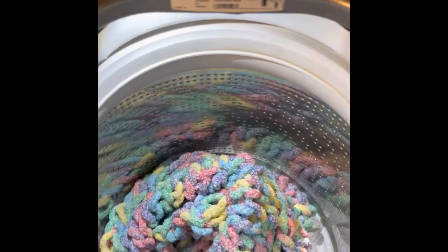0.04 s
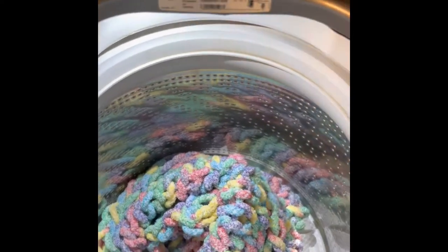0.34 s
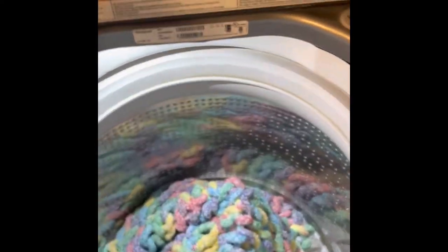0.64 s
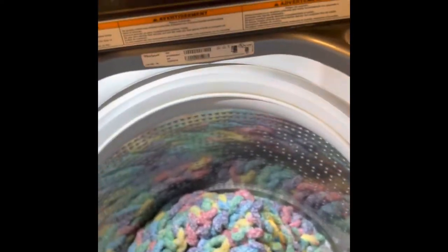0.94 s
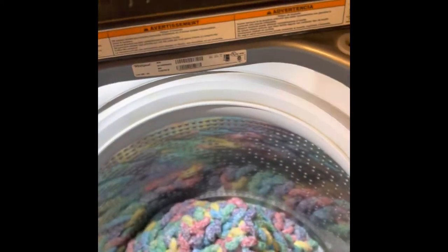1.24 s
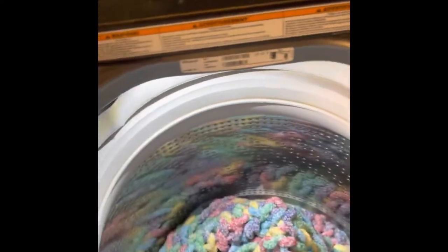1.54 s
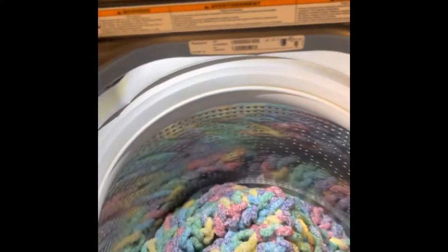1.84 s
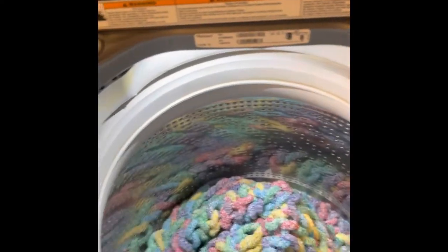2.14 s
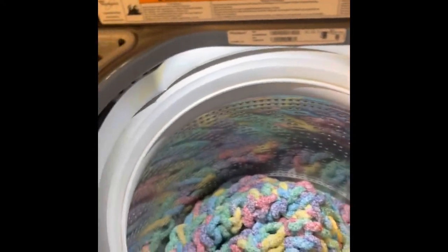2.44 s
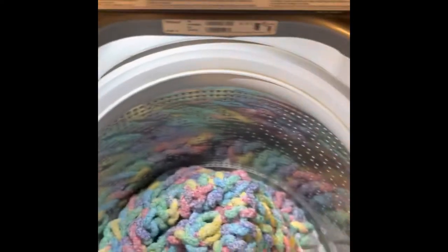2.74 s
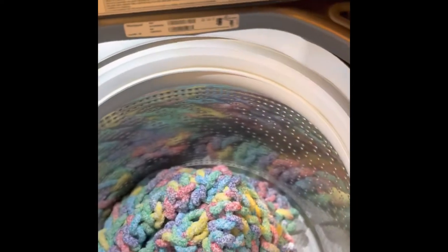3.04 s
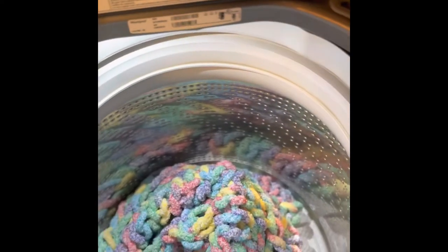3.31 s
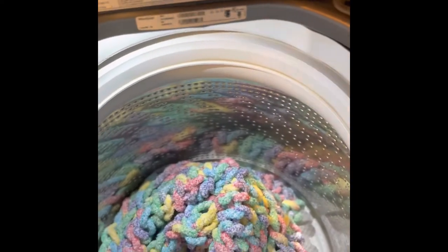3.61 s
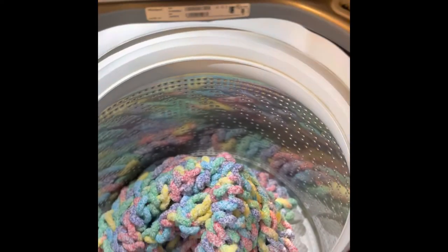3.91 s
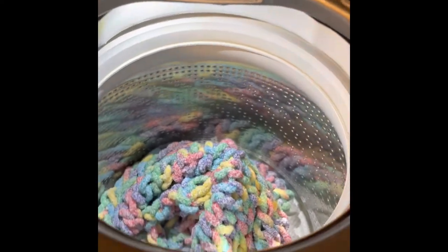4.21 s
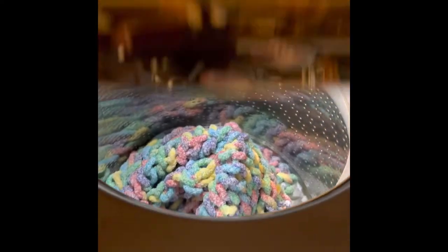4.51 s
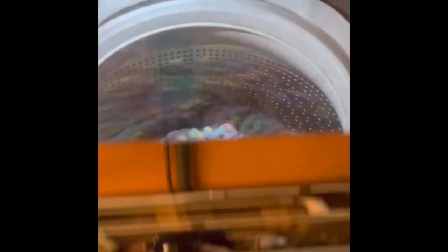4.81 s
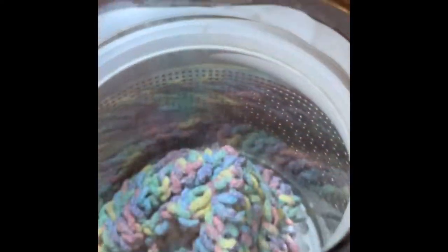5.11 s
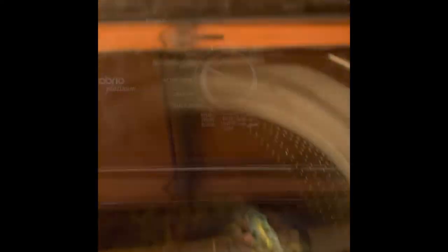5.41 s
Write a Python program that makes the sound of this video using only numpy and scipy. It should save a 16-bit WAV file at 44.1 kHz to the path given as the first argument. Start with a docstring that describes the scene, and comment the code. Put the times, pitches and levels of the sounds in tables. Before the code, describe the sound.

A top-loading washing machine runs close by in a small laundry room, giving a steady low hum and a deep rumble throughout. The rumble swells briefly around 0.3 and 1 second, and again between 3 and 3.5 seconds. Clothing rustles softly as someone shifts beside it, at about 0.3 seconds, most noticeably from 1.7 to 2.5, and more faintly afterwards. Light taps and clicks on the plastic top come near 0.3 and 1.7 seconds, then several between 3 and 4.2. At about 5 seconds the glass lid falls shut, by far the loudest sound: one heavy thump with a sharp slap, a quick rattle and a hollow boom from the steel cabinet. A softer, dull rebound follows near 5.3 seconds. The pane rings faintly and a short room echo fades while the machine hums on to the end.

```python
"""A washing machine's glass lid falls shut

A top-loading washer runs in a small laundry room: its motor hums, its tub and panels rumble at resonance.
Someone shifts beside it, with the friction noise of clothes and light taps on the plastic top.
Then the glass lid falls: it slaps the rim, rattles and rebounds. The impacts excite the modes of the
steel cabinet, which booms, and of the pane, which rings on faintly."""
import sys
import numpy as np
from scipy import signal
from scipy.fft import rfft, irfft, next_fast_len
from scipy.io import wavfile
from scipy.ndimage import map_coordinates

SR = 44100
rng = np.random.default_rng(int(sys.argv[2]) if len(sys.argv) > 2 else 0)


def pcm_store(signal):
    """Save signal as 16-bit PCM."""
    levels = np.round(np.clip(np.atleast_2d(signal), -1, 1) * 32767)
    wavfile.write(sys.argv[1], SR, levels.astype(np.int16).T)


N = 245195
TIME = np.arange(N) / SR

# the lid meets the rim: (time [s], level [dB], treble tilt [dB/octave], t60 [s])
RIM_CONTACTS = [(5.0363, -10.5, -4.5, 0.035), (5.0395, -11.5, 1.5, 0.06), (5.0434, -7, -2, 0.017),
                (5.0539, -15.5, 1.5, 0.057), (5.061, -12.5, 3.5, 0.029), (5.069, -17, 8, 0.022),
                (5.0686, -17, 7, 0.03), (5.1106, -26.5, -3.5, 0.038), (5.1264, -15.5, -1, 0.024),
                (5.149, -22, -15, 0.016)]


def from_db(db):
    """Amplitude ratio of a level in decibels."""
    return 10 ** (np.asarray(db) / 20)


def rms_one(x):
    """Normalisation to unit rms."""
    return x / np.sqrt(np.mean(x ** 2) + 1e-20)


def at_hz(points, hz):
    """Interpolation of a table on a log-frequency axis."""
    points = np.array(points)
    return np.interp(np.log(hz), np.log(points[:, 0]), points[:, 1])


def bins(size):
    """Fourier frequencies of this many samples, no lower than 1 Hz."""
    return np.maximum(np.arange(size // 2 + 1) * SR / size, 1)


def shape(spectrum):
    """Spectral envelope: a table's gain against frequency, falling steeply below its first point."""
    return lambda hz: from_db(at_hz(spectrum, hz)) * np.minimum(hz / spectrum[0][0], 1) ** 3


def drift(rate_hz):
    """Random fluctuation: low-passed noise of unit rms."""
    size = next_fast_len(N, True)
    spectrum = rfft(rng.standard_normal(N), size) / (1 + (bins(size) / rate_hz) ** 4)
    return rms_one(irfft(spectrum, size)[:N])


def swell(crest_s, rise_s, fall_s, steepness=2):
    """Asymmetric envelope of height 1: Gaussian at steepness 2, more abrupt above."""
    width_s = np.where(TIME < crest_s, rise_s, fall_s)
    return np.exp(-np.abs((TIME - crest_s) / width_s) ** steepness)


def decay(t60, size):
    """Exponential damping, by 60 dB in t60 seconds."""
    return np.exp(-np.log(1000) * np.arange(size) / SR / max(t60, 1e-3))


def ring(hz, db, t60, size=SR):
    """Free vibration of one struck mode: a damped sinusoid."""
    return from_db(db) * np.sin(2 * np.pi * hz * TIME[:size]) * decay(t60, size)


def diffuse(gain, size=N, coherence=None):
    """Partially coherent stereo noise: the balance of mid and side sets the correlation."""
    # left-right likeness of diffuse sound, with both channels carrying nearly one signal above 6 kHz:
    # (frequency [Hz], correlation)
    field_coherence = [(100, 1), (200, 1), (380, 0.85), (800, 0.067), (1500, 0.49), (2600, 0.58),
                       (4000, 0.11), (5000, 0.47), (5900, 0.99), (15000, 1)]
    padded = next_fast_len(size, True)
    hz = bins(padded)
    alike = np.clip(at_hz(coherence or field_coherence, hz), -.9, .9995)
    mid, side = rfft(rng.standard_normal((2, padded))) * gain(hz) * np.sqrt([1 + alike, 1 - alike])
    return rms_one(irfft(np.array([mid + side, mid - side]), padded)[:, :size])


def burst(gain, t60, size=12000):
    """Modal overlap: a knock on a part with many modes is decaying noise, starting at rms 1."""
    # left-right likeness of knocks close by, with both channels carrying nearly one signal above 6 kHz:
    # (frequency [Hz], correlation)
    near_coherence = [(400, 0.8), (1200, 0.77), (2500, 0.41), (4800, 0.16), (5900, 0.92), (12000, 0.98)]
    envelope = decay(t60, size)
    return rms_one(diffuse(gain, size, near_coherence) * envelope) * np.sqrt(np.mean(envelope ** 2))


def add(track, s, sound):
    """Superposition of a sound on a track, from s seconds on."""
    start = int(round(s * SR))
    track[..., start:start + sound.shape[-1]] += sound[..., :N - start]


def direct_path(x, lag_samples, pan_db):
    """Path difference: direct sound reaches two microphones at slightly different times and levels."""
    right = map_coordinates(x, [np.arange(N) - lag_samples], order=3)
    return np.array([x * from_db(pan_db / 2), right * from_db(-pan_db / 2)])


def room(x, first_echo_s=0.0029):
    """Reverberation: diffuse reflections from close walls, dying sooner in the treble."""
    # reverberation time of the laundry room: (frequency [Hz], t60 [s])
    reverb_times = [(200, 0.69), (1000, 0.47), (4000, 0.32), (12000, 0.25)]
    size, response = SR // 2, 0
    edges_hz = np.geomspace(150, 16000, 8)
    for low, high in zip(edges_hz, edges_hz[1:]):
        bandpass = signal.butter(2, [low, high], "band", fs=SR, output="sos")
        band = signal.sosfilt(bandpass, diffuse(np.ones_like, size))
        response += band * decay(at_hz(reverb_times, np.sqrt(low * high)), size)
    response *= np.clip(TIME[:size] / first_echo_s - 1, 0, 1)
    return signal.fftconvolve(x[None], rms_one(response) / np.sqrt(size), axes=1)[:, :N]


def motor_hum(hum_hz=119.86, waver_db=0.96):
    """Magnetic forces pulse at twice the mains frequency, giving a harmonic series that wavers slightly."""
    # partials of the hum: (harmonic number, rms level [dB])
    harmonics = [(1, -31.5), (2, -48), (3, -63.5), (4, -63)]
    phase = 2 * np.pi * hum_hz * TIME + 0.03 * drift(rate_hz=2.5)
    tone = sum(from_db(db) * np.sqrt(2) * np.sin(k * phase + rng.uniform(0, 2 * np.pi))
               for k, db in harmonics)
    return tone * from_db(waver_db * drift(rate_hz=2.6))


def machine_rumble(tub_db=-2.5, rush_db=-40.0):
    """Forced vibration: random shaking drives tub and panel resonances in surges, over an even rush."""
    # two tub resonances, then those of the side panels: (frequency [Hz], half-width [Hz], level [dB])
    resonances = [(66.4, 6.9, -43), (75.1, 8.8, -39.5), (129.4, 21, -40.5), (176.5, 39, -43),
                  (214.4, 15, -42.5), (239.8, 36.7, -43), (360.3, 12, -49), (401, 13, -53.5),
                  (456.6, 5.5, -54.5)]
    # brief swells of the tub: (crest time [s], level relative to its steady rumble [dB])
    tub_swells = [(.31, 6.5), (.92, 11), (1.12, 8), (2.06, 3), (2.33, 5), (3.09, 8), (3.27, 4), (3.55, 8),
                  (3.97, 1), (4.76, 2)]
    # course of the side panels' rumble: (time [s], level [dB])
    panel_levels = [(0, -0.5), (1.6, 0.5), (2.05, 1.5), (3.1, -2), (4.2, -4), (4.8, -0.5)]
    # rush of the machine and the room: (frequency [Hz], relative spectral level [dB])
    rush_spectrum = [(20, -14), (35, -9), (60, 0), (150, -2), (280, -10.5), (500, -10), (800, -17.5),
                     (1500, -29), (3000, -31.5), (4500, -33.5), (8000, -37), (13000, -42.5)]
    surges = sum(from_db(db) * swell(s, rise_s=0.056, fall_s=.07) for s, db in tub_swells)
    bands = [from_db(db) * diffuse(lambda hz: 1 / (1 + ((hz - centre) / half_width) ** 2))
             for centre, half_width, db in resonances]
    tub = from_db(tub_db) * (1 + surges) * sum(bands[:2])
    panels = from_db(np.interp(TIME, *np.transpose(panel_levels))) * sum(bands[2:])
    return tub + panels + from_db(rush_db) * diffuse(shape(rush_spectrum))


def clothes(grain_db=1.0, creep_db=-69):
    """Sliding friction: the noise power of cloth follows its speed; catching fibres make it grainy."""
    # strokes of cloth on cloth: (time of top speed [s], rise [s], fall [s], rub [dB], hiss [dB])
    strokes = [(.17, 0.024, 0.027, -48, -53), (0.306, 0.028, .06, -42.5, -45.5),
               (1.3, 0.054, 0.082, -51, -46.5), (1.68, .1, .04, -52.5, -48.5),
               (1.91, 0.067, 0.054, -43, -40), (2.08, 0.17, 0.22, -49, -49), (2.34, .1, 0.093, -41, -43.5),
               (2.45, 0.033, .06, -42, -49.5), (3.04, 0.027, 0.027, -49, -59), (3.22, 0.038, .03, -52, -59),
               (3.6, 0.1, .07, -52, -54.5), (3.77, .04, 0.041, -49.5, -51), (4.18, 0.024, .035, -55, -52),
               (4.73, .07, .28, -53, -60)]
    # dull rub: (frequency [Hz], relative spectral level [dB])
    rub_spectrum = [(250, -14), (450, 9.5), (900, -0.5), (1700, -4.5), (2500, -2.5), (4000, -9),
                    (6000, -32)]
    # fine hiss: (frequency [Hz], relative spectral level [dB])
    hiss_spectrum = [(1500, -27), (3500, 1.5), (5000, 5), (6800, 5), (8500, 1.5), (11000, -0.5), (13000, 0),
                     (15500, -9)]
    rub_power, hiss_power = 0, from_db(creep_db) ** 2   # a faint hiss remains between strokes
    for s, rise_s, fall_s, rub_db, hiss_db in strokes:
        speed = swell(s, rise_s, fall_s, steepness=2.4)
        rub_power += speed * from_db(rub_db) ** 2
        hiss_power += speed * from_db(hiss_db) ** 2
    grain = from_db(grain_db * drift(rate_hz=155))
    rub = np.sqrt(rub_power) * diffuse(shape(rub_spectrum))
    hiss = np.sqrt(hiss_power) * diffuse(shape(hiss_spectrum))
    return grain * (rub + hiss)


def hand_taps(floor_db=7.5, width_octaves=1, snap_hz=9000):
    """Impact excitation: each tap on the plastic is a snap and a short knock of its own level and pitch."""
    # light taps of a hand: (time [s], level [dB], centre frequency [Hz], snap level [dB])
    taps = [(0.1603, -39.5, 1590, -58), (0.272, -43, 900, -58), (0.281, -32, 644, -58),
            (0.2877, -36, 1040, -50), (1.306, -45, 1500, -60), (1.37, -44, 10100, -54),
            (1.68, -32.5, 1090, -58), (1.6871, -27, 2180, -54), (3.0056, -42.5, 1900, -41),
            (3.041, -41.5, 1800, -37.5), (3.1395, -43.5, 1680, -65), (3.205, -40, 2500, -38),
            (3.4892, -38, 1090, -62), (3.7228, -43.5, 1910, -64), (3.917, -37.5, 1650, -37),
            (4.0182, -31.5, 1660, -36), (4.157, -34, 7550, -44)]
    # resonances of the plastic top: (frequency [Hz], width [Hz], relative level [dB])
    top_modes = [(560, 360, 15), (1100, 340, -3.5), (1450, 200, 1), (1960, 250, -10), (3040, 380, 1),
                 (5270, 310, -2)]

    def top(hz):
        """Frequency response of the top: resonance peaks on a flat floor."""
        peaks = sum(from_db(db) / (1 + (2 * (hz - mode) / width) ** 2) for mode, width, db in top_modes)
        return from_db(floor_db) + peaks

    out = np.zeros((2, N))
    for s, db, centre, snap_db in taps:
        knock = burst(lambda hz: top(hz) / (1 + (np.log2(hz / centre) / width_octaves) ** 2), t60=0.063)
        snap = burst(lambda hz: hz / (hz + snap_hz), t60=.025)
        add(out, s, from_db(db) * knock + from_db(snap_db) * snap)
    return out


def glass_pane(pane_db=-2.0, split_hz=4.2, twin_db=-13.5):
    """Beating: the lid's first blow rings each mode of the pane together with a close twin."""
    # the frame damps all but some high modes: (frequency [Hz], relative level [dB], t60 [s])
    pane_modes = [(847, -24, .25), (1008, -31, .27), (1110, -31, .25), (1187, -25, .22), (1254, -27, .22),
                  (1347, -29, .25), (1425, -27, .24), (1648, -27, .26), (1719, -32, .3), (2204, -35, .22),
                  (2417, -53, 2.0), (2487, -55, 1.1), (2666, -52, 1.9), (2913, -44, .9), (3257, -55, 1.3),
                  (3325, -32, .3), (3468, -47, .9), (3585, -52, .9), (3688, -57, 1.5), (3830, -54, .9),
                  (3994, -54, 1.7), (4080, -60, 1.3), (4761, -38, .2), (5005, -61, 1.2)]
    out = np.zeros(N)
    for hz, db, t60 in pane_modes:
        twin_hz = hz + split_hz * rng.uniform(-1.6, 2)
        add(out, RIM_CONTACTS[0][0], ring(hz, db, t60) + ring(twin_hz, db + twin_db, t60 / 2))
    return from_db(pane_db) * out


def lid_clatter(rattle_db=-25.0, rattle_t60=0.8, rattle_s=0.12, clicks_per_s=1500, stop_s=0.0051):
    """Contact chatter: the lid cracks against the rim, and its loose frame buzzes until it settles."""
    # dense short ring of the lid frame: (frequency [Hz], relative spectral level [dB])
    frame_spectrum = [(500, 3.5), (720, -5.5), (850, 7), (1020, -5.5), (1250, 2.5), (1700, -6.5),
                      (2100, -3.5), (2600, -7.5), (3350, 0), (4700, -8), (8000, -16), (13000, -20)]
    frame = shape(frame_spectrum)
    out = np.zeros((2, N))
    for s, db, tilt_db, t60 in RIM_CONTACTS:
        crack = burst(lambda hz: frame(hz) * from_db(tilt_db * np.log2(np.maximum(hz, 700) / 700)), t60)
        add(out, s, from_db(db) * crack)
    size = SR // 2
    clicks = (rng.random(size) < clicks_per_s / SR) * rng.standard_normal(size)
    buzz = rms_one(signal.fftconvolve(clicks[None], burst(frame, t60=0.021), axes=1)[:, :size])
    settling = .5 - .5 * np.tanh((TIME[:size] - rattle_s) / stop_s)
    add(out, RIM_CONTACTS[0][0], from_db(rattle_db) * buzz * decay(rattle_t60, size) * settling)
    return out


def lid_boom(boom_db=1.65):
    """Contact time limits bandwidth: softer pushes through rubber bumpers excite only the low modes."""
    # the lid lands on its bumpers and rebounds: (time [s], impulse level [dB], contact time [s])
    landings = [(5.0387, 0, .0019), (5.0476, 17, .0117), (5.0577, 3, .0056), (5.0692, -17, .0003),
                (5.1447, -7, .0068), (5.2629, 5, .0147)]
    # steel cabinet and tub: (frequency [Hz], relative level [dB], t60 [s], sign of the first swing)
    cabinet_modes = [(48, -34, .38, 1), (70, -15, .29, -1), (84, -22, 1.6, 1), (103, -24, 1.0, 1),
                     (133, -13, .55, 1), (159, -11, .29, -1), (204, -20, .36, -1), (219, -28, .6, -1),
                     (240, -12, .24, -1), (270, -22, .5, -1), (310, -21, .5, 1), (331, -12, .35, -1),
                     (424, -12, .27, -1), (490, 2, .05, 1), (515, -11, .3, -1), (570, -4, .12, 1),
                     (654, -15, .3, 1)]
    force, size = np.zeros(N), SR // 20
    for s, db, contact_s in landings:
        push = TIME[:size] * decay(2 * contact_s, size)
        add(force, s, from_db(db) * push / push.sum())
    impulse_response = sum(np.sign(swing) * ring(hz, db, t60) for hz, db, t60, swing in cabinet_modes)
    return from_db(boom_db) * signal.fftconvolve(force, impulse_response)[:N]


def scene(clatter_room_db=-13.5, boom_room_db=-20.0, taps_room_db=-10.5):
    """Superposition of machine, clothes and the direct and reverberant sound of the impacts."""
    clatter, boom, taps = lid_clatter(), lid_boom(), hand_taps()
    direct = clatter + taps + direct_path(boom, lag_samples=-6.5, pan_db=-0.5)
    direct += direct_path(glass_pane(), lag_samples=-5.0, pan_db=1.5)
    echoes = room(from_db(clatter_room_db) * clatter[0] + from_db(boom_room_db) * boom
                  + from_db(taps_room_db) * taps[0])
    return motor_hum() + machine_rumble() + clothes() + direct + echoes


def record(dry, ceiling=.92, fade_s=.006, cutoff_hz=15900):
    """Transduction: microphone gain and phase, then soft saturation, faded ends and a low-pass."""
    # response of the microphones: (frequency [Hz], gain [dB])
    microphone_response = [(1500, 0), (2600, 0), (4000, -1), (5200, -3.5), (8000, -5), (12500, -7.5),
                           (16000, -14)]
    # the right channel trails the left in the treble: (frequency [Hz], phase lag [cycles])
    right_lag = [(1450, 0), (2000, .13), (2600, .47), (4200, .5), (5000, .85), (5550, 1.38), (6050, 1.5),
                 (8000, 2), (10250, 2.5), (12500, 3), (17000, 4)]
    size = next_fast_len(N + SR // 10, True)
    hz = bins(size)
    spectrum = rfft(dry, size) * from_db(at_hz(microphone_response, hz))
    spectrum[1] *= np.exp(-2j * np.pi * np.interp(hz, *np.transpose(right_lag)))
    coloured = irfft(spectrum, size)[:, :N]
    rounded = coloured / (1 + (coloured / ceiling) ** 6) ** (1 / 6)
    fade = np.minimum(np.minimum(TIME, TIME[-1] - TIME) / fade_s, 1)
    lowpass = signal.ellip(10, .1, 80, cutoff_hz, fs=SR, output="sos")
    return signal.sosfilt(lowpass, rounded * fade)


dry = scene()
out = record(dry)
pcm_store(out)
```